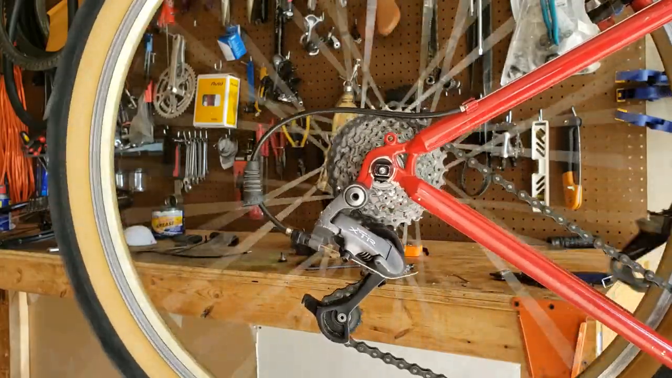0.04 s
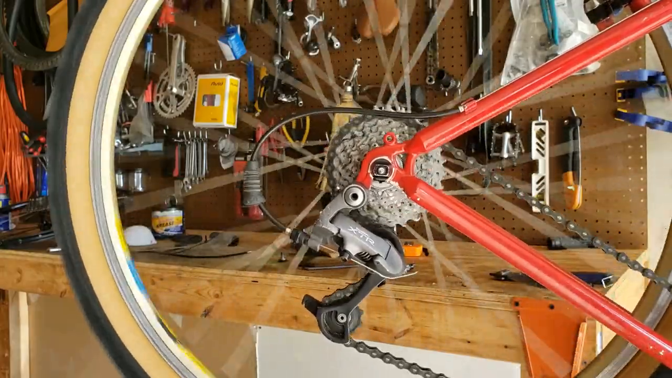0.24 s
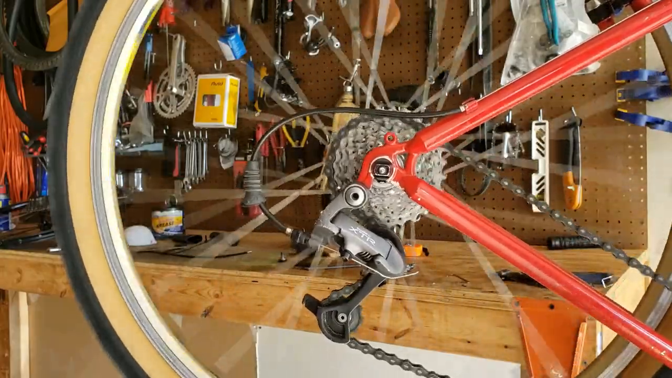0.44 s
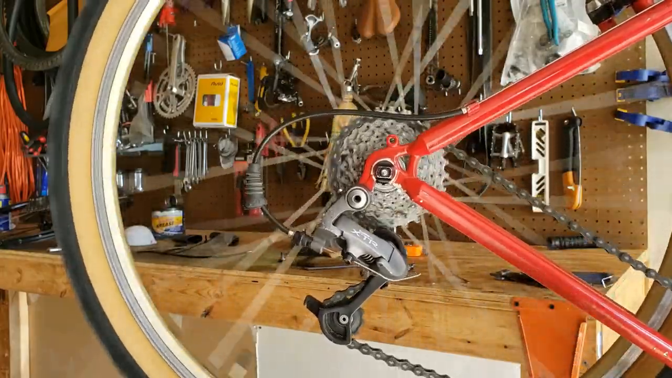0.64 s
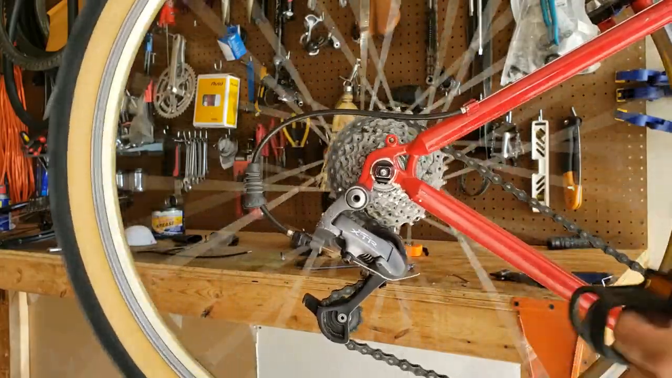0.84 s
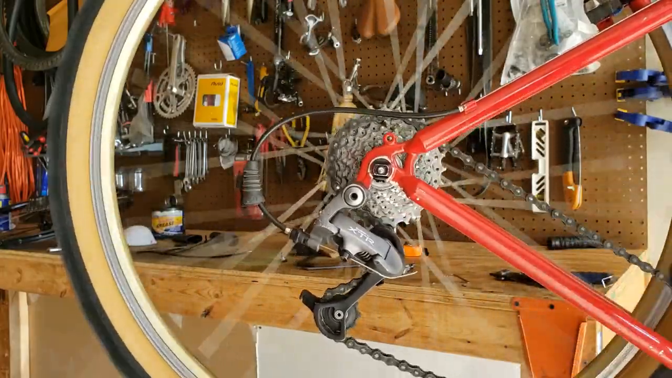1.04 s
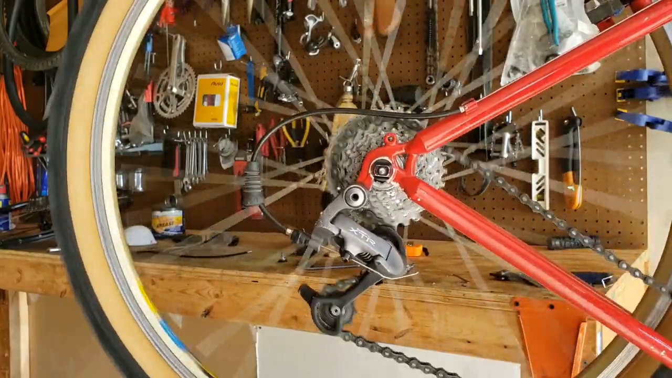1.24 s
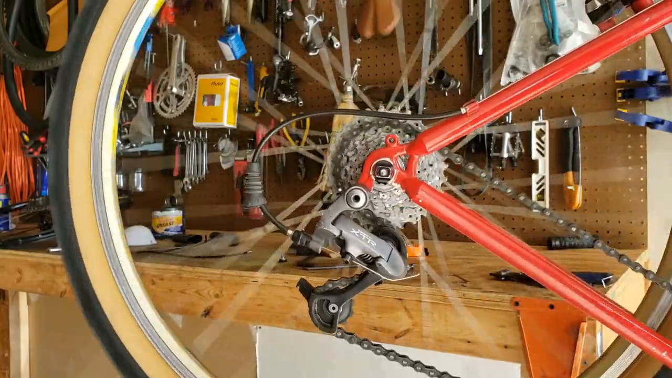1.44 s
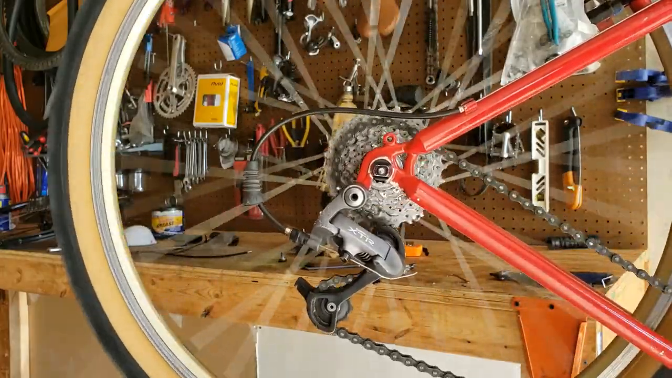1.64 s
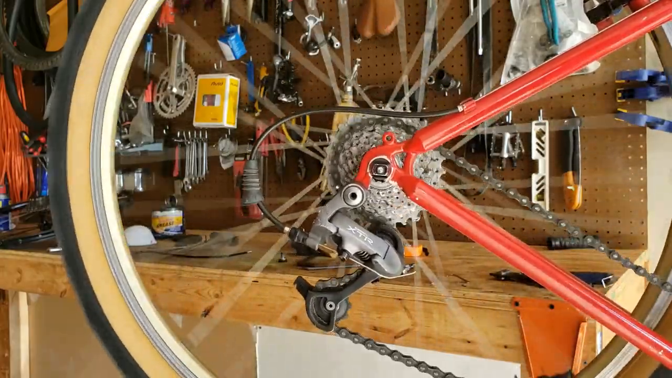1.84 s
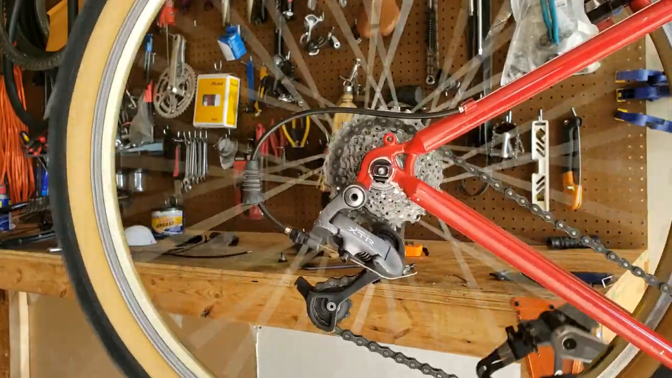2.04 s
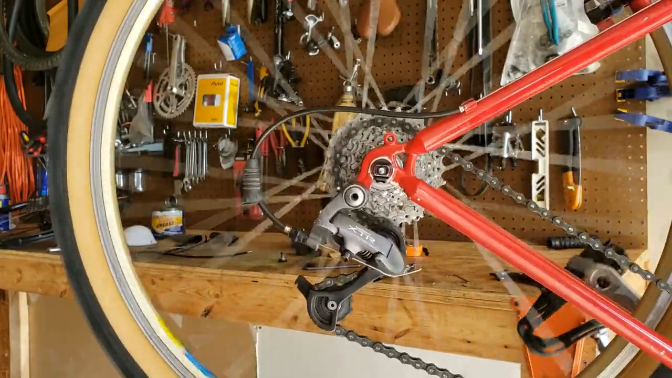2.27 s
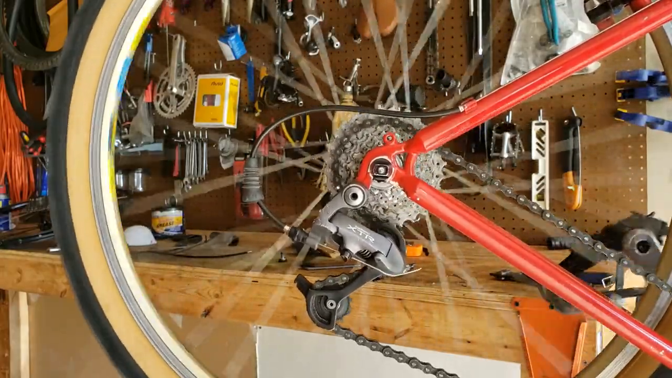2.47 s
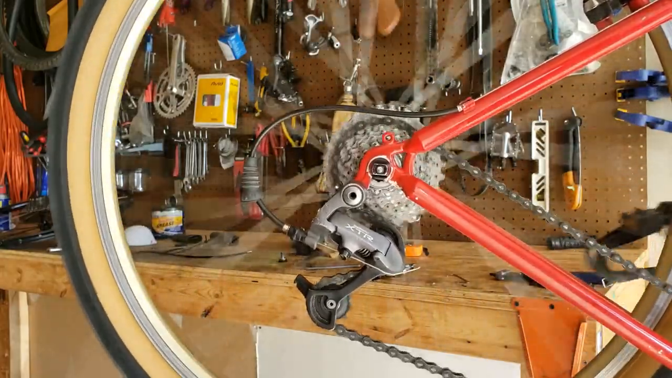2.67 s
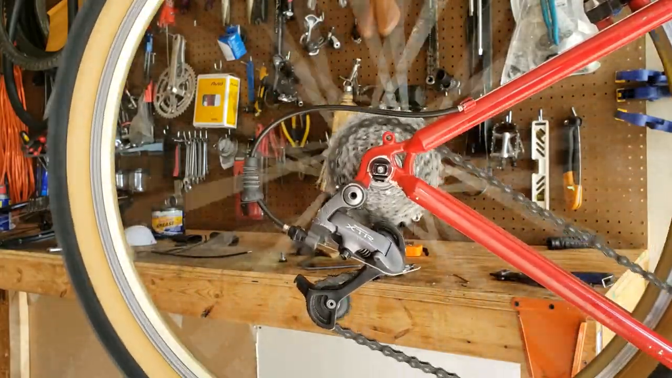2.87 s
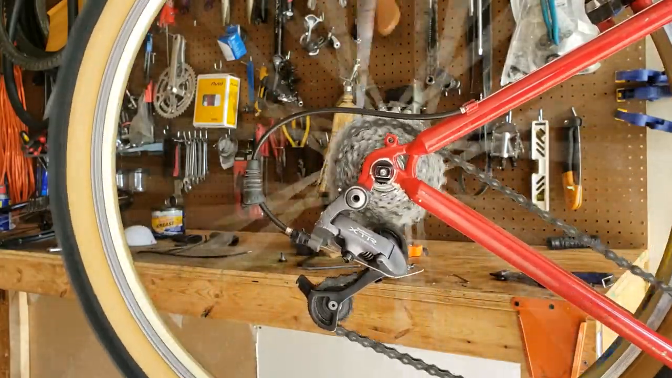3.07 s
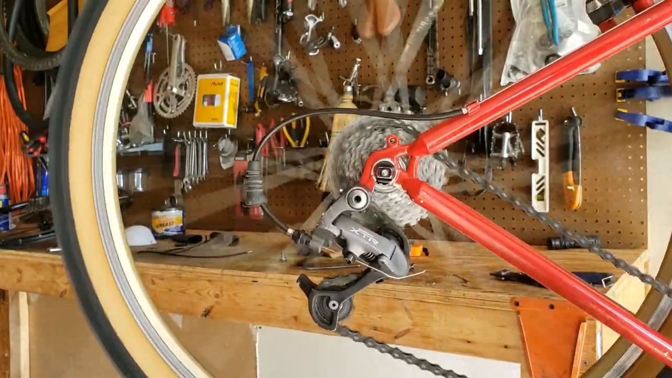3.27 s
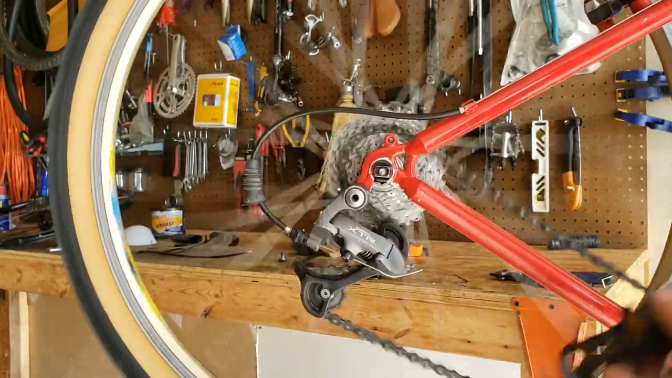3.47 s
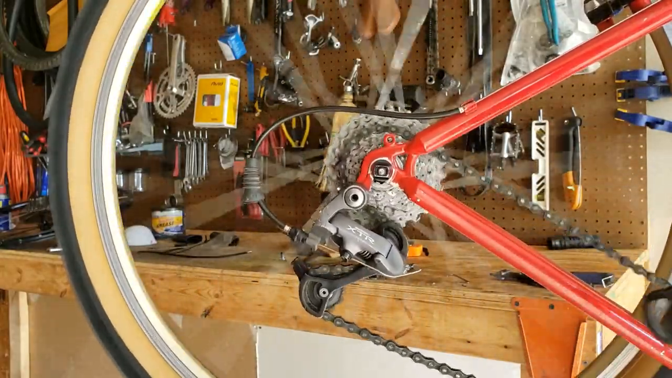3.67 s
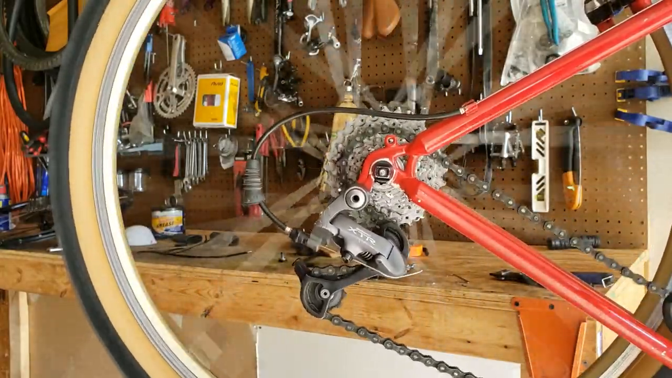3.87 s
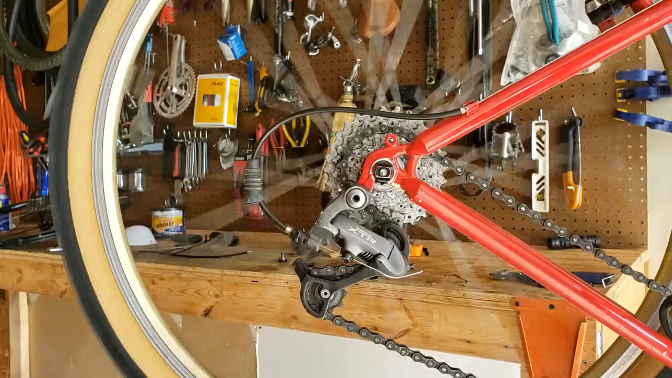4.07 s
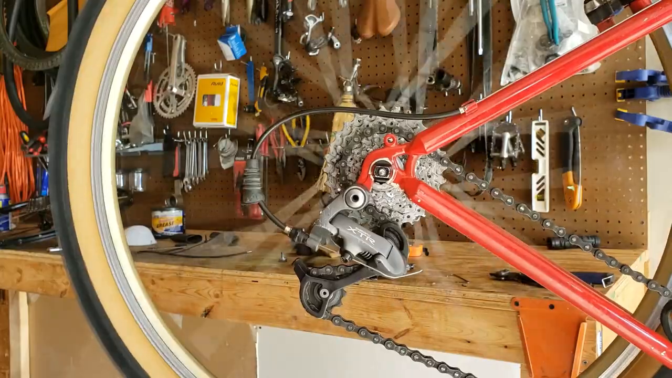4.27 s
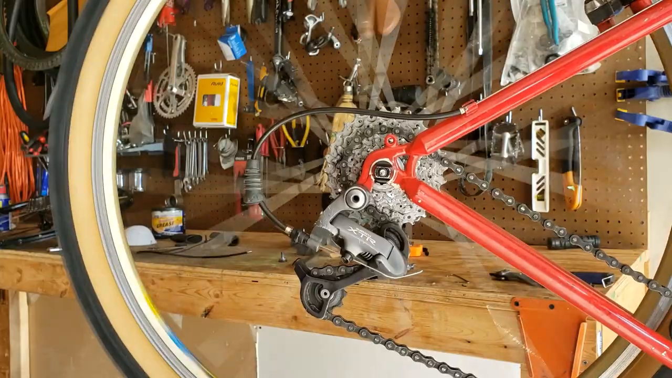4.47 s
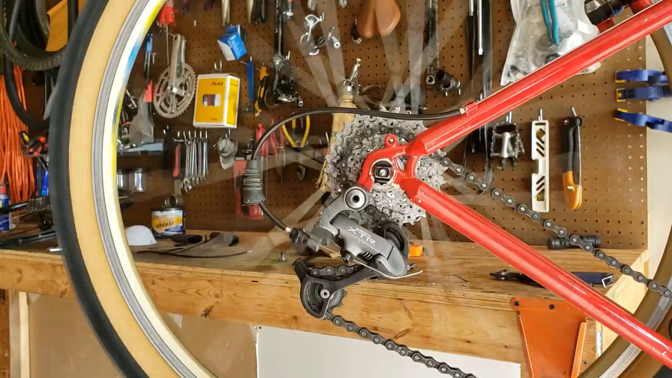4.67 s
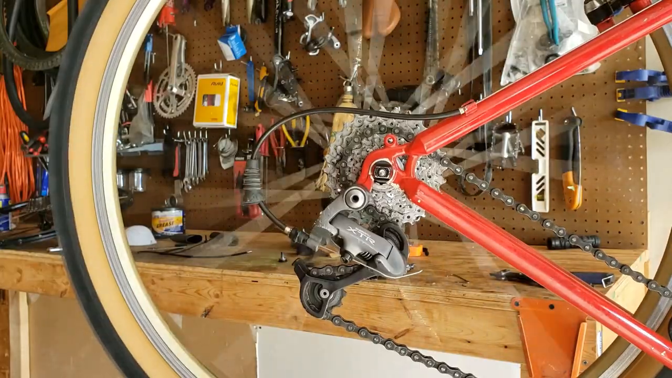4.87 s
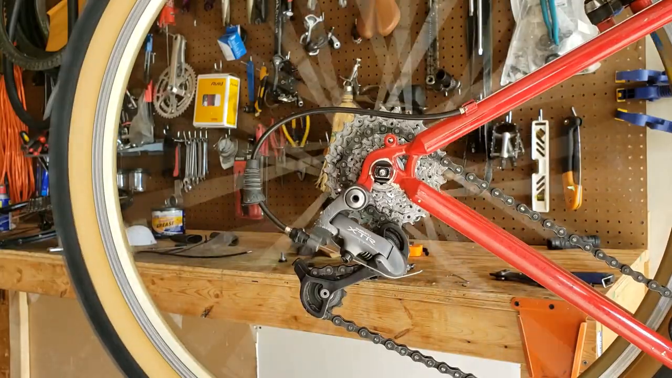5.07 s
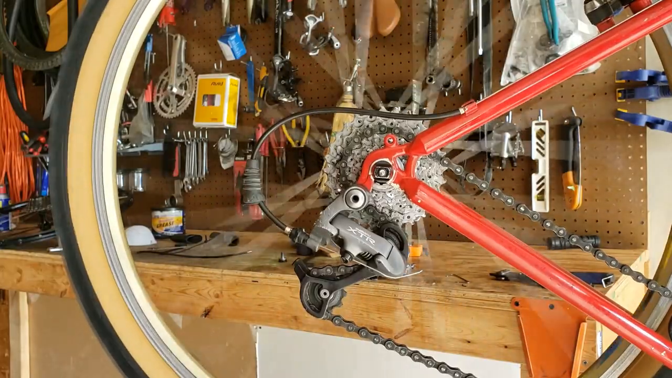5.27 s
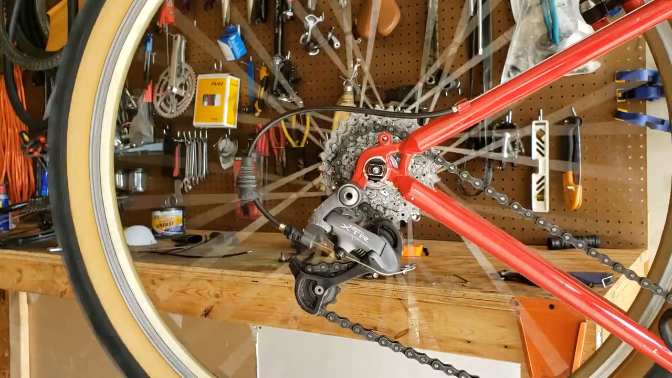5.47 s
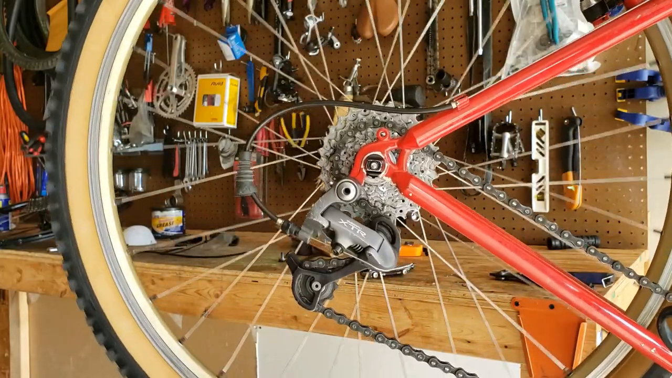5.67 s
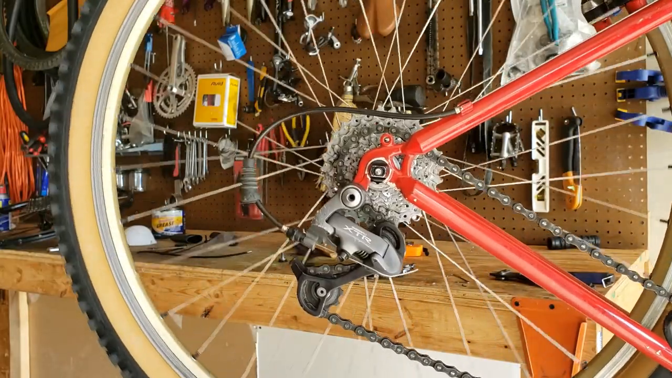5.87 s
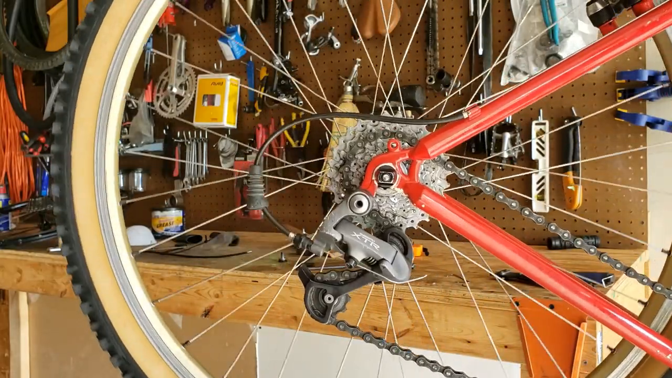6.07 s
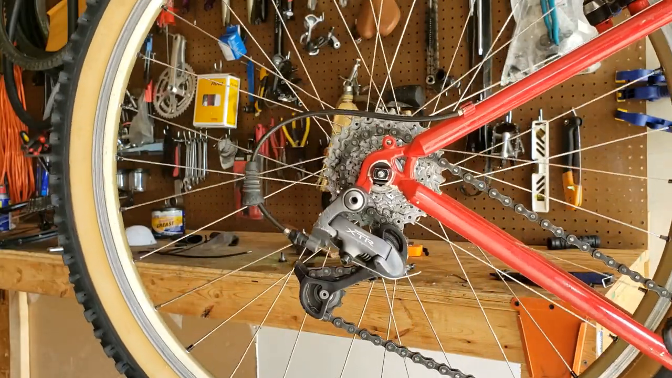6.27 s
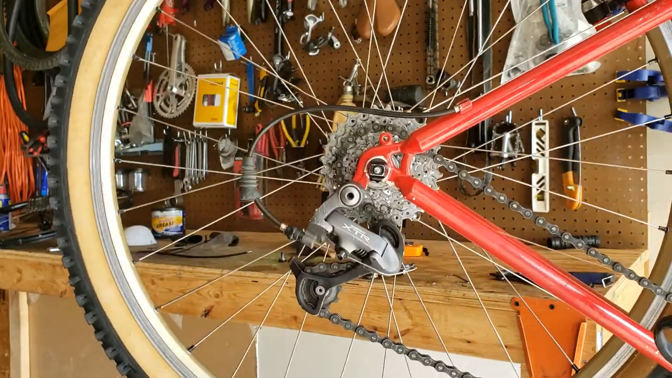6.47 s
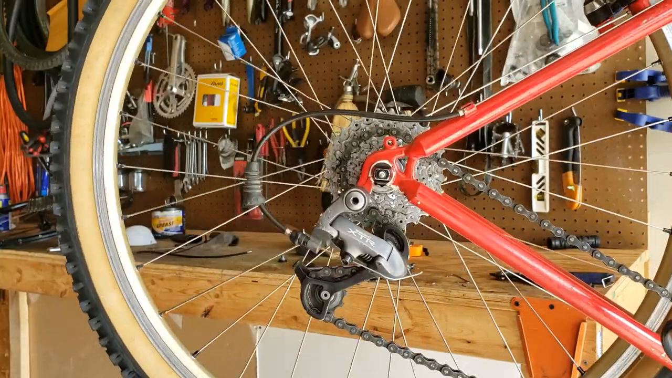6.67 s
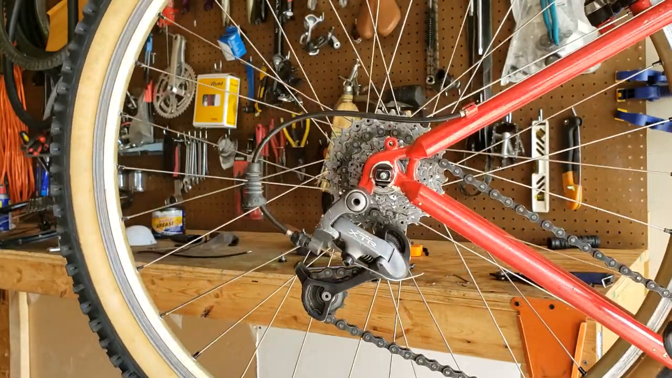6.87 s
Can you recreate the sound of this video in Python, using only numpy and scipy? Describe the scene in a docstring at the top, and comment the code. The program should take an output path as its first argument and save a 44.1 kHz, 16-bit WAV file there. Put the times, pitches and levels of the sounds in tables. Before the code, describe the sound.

A bicycle's rear hub ticks briskly in a garage, chain whirring and clanking between gears, then stops, leaving faint rumble and distant crickets.

```python
"""The ratchet in a bicycle's rear hub ticks as the wheel, on a stand in a garage, outruns its sprockets.
Each tick is a few tiny noise bursts, coloured and followed by ringing and echoes. The chain is grainy noise
with a hum; three times it clanks onto a new sprocket, as noise bursts through ringing tones and dull thuds.
When the wheel stops, filtered noise leaves a low rumble and what sounds like distant insects; then a soft bump.
Nearly all of it is on the left."""
import sys
import numpy as np
from scipy import signal
from scipy.fft import rfft, irfft
from scipy.io import wavfile
from scipy.ndimage import uniform_filter1d

SR = 44100
rng = np.random.default_rng(int(sys.argv[2]) if len(sys.argv) > 2 else 0)


def pcm_store(signal):
    """Save signal as 16-bit PCM."""
    levels = np.round(np.clip(np.atleast_2d(signal), -1, 1) * 32767)
    wavfile.write(sys.argv[1], SR, levels.astype(np.int16).T)


N = 305163
TIME = np.arange(N) / SR  # seconds

# How fast the wheel outruns the sprockets: t/s, speed/(ratchet teeth per second)
OVERRUN_SPEED = [(0.0, 14.24), (0.234, 13.59), (0.445, 8.37), (0.718, 5.84), (1.031, 13.26), (1.032, 16.4),
                 (1.281, 16.27), (1.347, 13.01), (1.739, 13.62), (1.857, 10.98), (2.402, 15.82),
                 (2.673, 13.42), (2.89, 5.98), (3.375, 5.51), (3.43, 10.21), (3.553, 6.82), (3.899, 23.43),
                 (4.182, 21.52), (4.509, 21.82), (5.339, 21.39), (5.595, 8.13), (5.7, 0.0)]
# Colour of a tick close by: f/Hz, level/dB
TICK_COLOUR = [(300, -42.5), (800, -31.5), (1300, -11), (2200, -11), (3450, -3), (4700, -17.5), (6300, -10),
               (7300, -12.5), (8100, -1), (8900, -9), (10000, -1.5), (11700, -4.5), (12500, 0),
               (14600, 4.5), (15800, 0)]
# Colour of the tick's ring in the wheel and the garage: f/Hz, level/dB
RING_COLOUR = [(300, -43), (750, -17.5), (1250, -7), (1750, 0.5), (2100, -2.5), (3200, 0.5), (4600, -11),
               (6400, -2.5), (7300, -7.5), (8100, -6), (8900, -5), (11700, -0.5), (12350, 3), (13200, 4.5),
               (15500, 2.5)]
# Colour of the tick's slowly building tail: f/Hz, level/dB
LATE_COLOUR = [(400, -23.5), (1300, 0.0), (3000, -4.0), (5000, -17.5)]
# Colour of the running chain: f/Hz, level/dB
CHAIN_COLOUR = [(600, -15.5), (1200, 2), (1750, 3), (3000, 2), (4700, -13.5), (14000, -8)]
# Loudness of the chain running over sprockets and pulleys: t/s, level/dB
CHAIN_LEVEL = [(0, -58), (1.3, -62.5), (2.6, -61.5), (3.3, -61.5), (4.2, -69), (5.5, -59), (5.68, -55),
               (5.85, -84)]
# Colour of the low rumble around the bicycle: f/Hz, level/dB
RUMBLE_COLOUR = [(22, -26.5), (45, -1), (70, 1.5), (145, -7), (200, -22.5), (400, -28), (1400, -22.5),
                 (3500, -34.5), (7000, -43)]
# Colour of the far cricket chorus: f/Hz, level/dB
CRICKET_COLOUR = [(1600, -24), (2150, -3.5), (2500, -4), (2900, -11.5), (3400, -23.5), (7000, -55)]
# Colour of the one insect's high chirp: f/Hz, level/dB
CHIRP_COLOUR = [(9100, -42.5), (9550, -14), (10050, -9), (10500, -23), (16000, -34)]
# The chain catches on a sprocket: t/s, level before colouring/dB, climb before landing/ms,
# time between links/ms, brightness/dB, thud relative to blow/dB, thud pitch f/Hz
SHIFTS = [(1.309, -32.5, 2.97, 11, -5.5, -6.5, 376), (3.394, -48.5, 4, 4, -19, -7.5, 200),
          (3.528, -38, 18, 4.4, -4.5, -2, 336), (5.571, -31, 0.87, 6, 0.5, -16, 332)]
# Dull knocks of the frame as the wheel is stopped: t/s, level before colouring and mixing/dB
KNOCKS = [(5.421, -51), (5.451, -45), (5.51, -48)]
# Colour of the chain's blows: f/Hz, level/dB
CLANK_COLOUR = [(200, -32), (800, -7.5), (1200, 1.5), (3400, 0.5), (5000, -6), (14000, -1)]
# Ringing tones of the sprockets and derailleur cage: f/Hz, level/dB
SPROCKET_TONES = [(393, -9.5), (543, -3), (1178, -2), (1298, -5), (1421, -9), (1940, -5.5), (2735, -5),
                  (3016, -7), (3570, -3.5), (4030, 3)]
# Colour of the soft bump near the end: f/Hz, level/dB
BUMP_COLOUR = [(70, -8), (150, 4.0), (220, 1.5), (320, -11.5), (560, -7), (900, -43), (3000, -41)]
# Colour of the right-hand share: f/Hz, level/dB
RIGHT_COLOUR = [(100, 2.5), (1000, -3), (2500, -14), (5000, -2), (8000, -0.5), (14000, 2.0)]
# Colour of the microphone hiss: f/Hz, level/dB
HISS_COLOUR = [(20, -13), (90, 3.5), (1000, -8), (4500, -18.5), (8200, -29), (10500, -17), (15500, -14)]

# A faster ratchet ticks harder, and its pawls drop closer together
USUAL_TEETH_PER_S = 16
TICK_DB, TICK_DB_PER_DOUBLING, TICK_SCATTER_DB = -37.5, 2.07, 0.67  # before colouring and mixing
CLATTER_MS, CLATTER_EXPONENT, CLATTER_SCATTER = 3.93, 0.612, .22  # time scale at the usual speed
# The stand hums more as the wheel runs faster; the level is relative to the chain at the usual speed
HUM_DB, HUM_DB_PER_TOOTH_PER_S = -8.5, 0.92
CHIRP_RATE, CHIRP_START_S = 5.55, 5.883  # chirps per second, and a moment when one begins
# Each link lands more softly than the one before and rattles briefly; the frame answers a moment later
LINK_STEP_DB, LINK_RATTLE_MS, THUD_DELAY_MS = -3, 9.1, 7.1
CLIMB_DB, CLIMB_BRIGHT_DB = -8.5, -17  # climbing links scrape dully
KNOCK_MS, KNOCK_RATTLE_DB, KNOCK_BRIGHT_DB, KNOCK_HZ = 36, -2.5, -11, 268
SPROCKET_T60_S = .17  # time to fade by 60 dB
TOP_HZ = 15750


def undb(db):
    """Turn decibels into a gain."""
    return 10 ** (np.asarray(db) / 20)


def unit(x):
    """Scale a sound to an rms (average strength) of one."""
    return x / np.sqrt(np.mean(x ** 2))


def unit_energy(x):
    """Scale a response so that it keeps the power of white noise."""
    return x / np.sqrt(np.sum(x ** 2))


def through(x, response):
    """Pass a sound through an impulse response, the echo pattern of a single click."""
    return signal.fftconvolve(x, response)[:len(x)]


def colour(x, points, size=4096):
    """Shape the spectrum to a curve of (f/Hz, level/dB) points, with no sound before its cause."""
    hz, db = np.transpose(points)
    bins = np.maximum(np.fft.rfftfreq(size, 1 / SR), 1)
    curve_db = np.interp(np.log(bins), np.log(hz), db)
    # folding the cepstrum puts the filter's energy as early as possible
    cepstrum = irfft(np.log(undb(curve_db)))
    cepstrum[1:size // 2] *= 2
    cepstrum[size // 2 + 1:] = 0
    response = irfft(np.exp(rfft(cepstrum)))
    return through(x, unit_energy(response))


def tilt(x, db):
    """Brighten or dull a sound by setting treble against mid range."""
    return colour(x, [(1800, -db / 2), (7000, db / 2)])


def noise(points):
    """Steady noise of a given colour, rms one."""
    return unit(colour(rng.standard_normal(N), points))


def narrow(hz, width_hz):
    """Noise through a single resonance, rms one."""
    ring = np.exp(-np.pi * width_hz * TIME) * np.sin(2 * np.pi * hz * TIME)
    return unit(through(rng.standard_normal(N), ring))


def walk(rate):
    """Chance wandering: random values held for 1 / rate seconds, then smoothed."""
    hold = int(SR / rate)
    steps = np.repeat(rng.standard_normal(N // hold + 1), hold)
    return uniform_filter1d(steps, hold)[:N]


def add(track, s, sound):
    """Mix a sound into a track at a given second."""
    start = max(int(s * SR), 0)
    track[start:start + len(sound)] += sound[:N - start]


def burst(envelope, db):
    """Noise chatter under an envelope; the level is taken over 12 ms."""
    chatter = unit_energy(envelope * rng.standard_normal(len(envelope)))
    return chatter * undb(db) * np.sqrt(.012 * SR)


def fade(t60, build_s=.002):
    """Envelope of a ring that builds up briefly, then dies by 60 dB in t60 seconds."""
    t = TIME[:SR]
    decay = np.exp(-np.log(1000) * t / t60)
    return unit_energy(decay * (1 - np.exp(-t / build_s)))


def scatter(x, envelope):
    """Diffuse reflections, new for every blow because the wheel keeps turning."""
    power = np.abs(through(x ** 2, envelope ** 2))
    return rng.standard_normal(N) * np.sqrt(power)


def garage(x, t60_mid=0.54, t60_top=0.29, build_s=0.0061):
    """Reflections from walls, bench and tools; the treble dies first."""
    response = 0
    for kind, t60 in (("low", t60_mid), ("high", t60_top)):
        split = signal.butter(2, 4000, kind, fs=SR, output="sos")
        band = signal.sosfilt(split, rng.standard_normal(SR))
        response = response + band * fade(t60, build_s)
    return through(x, unit_energy(response))


def overrun():
    """Ratchet teeth passing per second at every moment."""
    return np.interp(TIME, *np.transpose(OVERRUN_SPEED))


def tick_times():
    """One tick for every passing tooth, starting midway between two; gives times and speeds."""
    speed = overrun()
    teeth = np.floor(.5 + np.cumsum(speed) / SR)
    drops = np.flatnonzero(np.diff(teeth) > 0)
    return TIME[drops], speed[drops]


def hub_shell(x, hz=1745, t60=0.11):
    """The hub's main resonance gives clicks a brief body."""
    ring = fade(t60, 1 / SR) * np.sin(2 * np.pi * hz * TIME[:SR])
    return through(x, unit_energy(ring))


def freehub(ring_ms=1.34, rise_ms=0.13, uneven_db=3.0, uneven_tilt_db=4.0, count=4):
    """Three pawls snap down one after another and one rebounds; each rings for a millisecond or so."""
    ms = TIME[:SR // 30] * 1000
    snaps = np.zeros(N)
    for s, speed in zip(*tick_times()):
        lag, force, (bright, hard, slow, *_) = rng.standard_normal((3, count))
        pace = speed / USUAL_TEETH_PER_S
        db = TICK_DB + TICK_DB_PER_DOUBLING * np.log2(pace) + TICK_SCATTER_DB * hard
        length_ms = CLATTER_MS / pace ** CLATTER_EXPONENT * np.exp(CLATTER_SCATTER * slow)
        # three drops and the rebound, each slightly off in time and force
        drops = length_ms * np.array([0, .36, .82, 2.3]) * np.exp(0.11 * lag)
        size = undb(np.array([-5.0, -1.0, -3.0, -17.0]) + uneven_db * force)
        age = np.maximum(ms - drops[:, None], 0)
        pawls = (1 - np.exp(-age / rise_ms)) * np.exp(-age / ring_ms) * size[:, None]
        envelope = np.linalg.norm(pawls, axis=0)
        add(snaps, s, tilt(burst(envelope, db), uneven_tilt_db * bright))
    # the turning spokes ring on briefly, the garage for longer
    ring = undb(-8.5) * scatter(snaps, fade(0.047, 0.00036))
    ring += undb(-5.0) * scatter(snaps, fade(0.3, 0.0027))
    ring += undb(-8.5) * garage(snaps, 0.047, 0.022, 0.00055)
    ring += undb(-5.5) * garage(snaps, 0.4, 0.18, 0.0018)
    # a mid-range tail builds up more slowly
    late = colour(scatter(snaps, fade(0.23, 0.029)), LATE_COLOUR)
    close = undb(1.87) * colour(snaps, TICK_COLOUR)
    return close + colour(ring, RING_COLOUR) + undb(-17.0) * late + undb(-20) * hub_shell(snaps)


def chain(grain_db=7.5):
    """Rollers settle on the teeth as grainy clicks that the garage smears; the stand hums along."""
    clicks = rng.standard_normal(N) * undb(grain_db * walk(350) + 1.6 * walk(25))
    run = unit(colour(clicks, CHAIN_COLOUR)) + undb(-13.5) * unit(hub_shell(clicks))
    run = unit(run + undb(-5) * garage(run))
    hum_db = HUM_DB + HUM_DB_PER_TOOTH_PER_S * (overrun() - USUAL_TEETH_PER_S)
    hum = undb(hum_db) * narrow(74.4, 26)
    level_db = np.interp(TIME, *np.transpose(CHAIN_LEVEL))
    return (run + hum) * undb(level_db)


def surroundings(chirp_peak=0.27):
    """Filtered noise: a rumble, a faint whine, a far cricket chorus and one insect's pulsing chirp."""
    rumble = noise(RUMBLE_COLOUR) * undb(-65.0 + 1.75 * walk(9.8))
    whine = undb(-76.5) * narrow(940, 49)
    chorus = noise(CRICKET_COLOUR) * undb(-62.5 + 2.1 * walk(18))
    # each chirp swells quickly, peaks at this share of its cycle and dies away
    cycle = (CHIRP_RATE * (TIME - CHIRP_START_S)) % 1 / chirp_peak
    pulse = unit(cycle ** 2 * np.exp(-2 * cycle))
    chirp = noise(CHIRP_COLOUR) * undb(-76 + 5.0 * walk(3.8))
    return rumble + whine + chorus + chirp * pulse


def rattle(envelope, db, bright_db, grain_db=5.0):
    """Grainy chatter of loose links."""
    grain = undb(grain_db * walk(900)[:len(envelope)])
    return tilt(burst(envelope * grain, db), bright_db)


def thud(envelope, db, hz):
    """A dull blow: a noise burst with a broad hump around one pitch."""
    hump = [(hz / 4, -12), (hz / 2, -3), (hz, 0), (hz * 2, -9), (hz * 4, -20), (hz * 8, -42)]
    return colour(burst(envelope, db), hump)


def sprockets(x):
    """The sprockets' ringing tones, cut short by the chain lying on them."""
    modes = 0
    for hz, db in SPROCKET_TONES:
        modes = modes + undb(db) * np.sin(2 * np.pi * (hz * TIME[:SR] + rng.random()))
    return through(x, unit_energy(modes * fade(SPROCKET_T60_S, 1 / SR)))


def gear_changes(thud_ms=26, count=4):
    """Links climb and clatter onto a sprocket, ringing it and thumping the frame; knocks shake the chain."""
    ms = TIME[:SR // 4] * 1000
    link_envelope, knock_envelope = np.exp(-ms / LINK_RATTLE_MS), np.exp(-ms / KNOCK_MS)
    blows, thuds = np.zeros((2, N))
    for s, db, climb_ms, gap_ms, bright_db, thud_db, thud_hz in SHIFTS:
        # a longer climb carries more energy
        scrape = rattle(ms < climb_ms, db + CLIMB_DB, CLIMB_BRIGHT_DB)
        add(blows, s - climb_ms / 1000, np.sqrt(climb_ms / LINK_RATTLE_MS) * scrape)
        for link in range(count):
            landing = rattle(link_envelope, db + link * LINK_STEP_DB, bright_db)
            add(blows, s + link * gap_ms / 1000, landing)
        add(thuds, s + THUD_DELAY_MS / 1000, thud(np.exp(-ms / thud_ms), db + thud_db, thud_hz))
    for s, db in KNOCKS:
        add(thuds, s, thud(knock_envelope, db, KNOCK_HZ))
        add(blows, s, rattle(knock_envelope, db + KNOCK_RATTLE_DB, KNOCK_BRIGHT_DB))
    metal = undb(-1.5) * colour(blows, CLANK_COLOUR) + undb(-19.5) * sprockets(blows)
    frame = undb(-8.0) * thuds + undb(-7.5) * garage(thuds, 0.63, .2)
    return metal + undb(-2.5) * garage(metal) + frame


def bump(s=6.525, db=-49.0, fade_s=0.1):
    """A soft, dull knock after the wheel has stopped: a fading noise burst, mostly low."""
    knock = np.zeros(N)
    add(knock, s, burst(np.exp(-TIME[:SR // 2] / fade_s), db))
    return colour(knock, BUMP_COLOUR)


def scene():
    """The right microphone picks up only a faint, thin, smeared share; both have their own hiss."""
    left = freehub() + chain() + surroundings() + gear_changes() + bump()
    share = undb(-30) * colour(left, RIGHT_COLOUR)
    right = garage(share, 0.027, .03, 0.00028) + undb(-4.5) * garage(share, 0.28, 0.16, 0.0013)
    left_hiss, right_hiss = undb(-74) * noise(HISS_COLOUR), undb(-74.5) * noise(HISS_COLOUR)
    return np.array([left + left_hiss, right + right_hiss])


def record(dry):
    """A steep low-pass filter cuts the top of the treble."""
    low_pass = signal.ellip(10, .2, 70, TOP_HZ, fs=SR, output="sos")
    return signal.sosfilt(low_pass, dry)


dry = scene()
out = record(dry)
pcm_store(out)
```